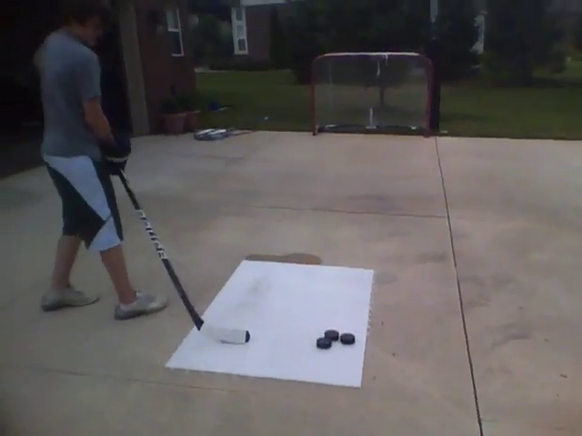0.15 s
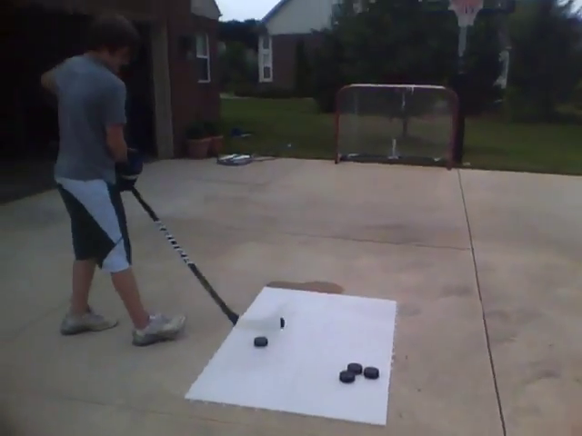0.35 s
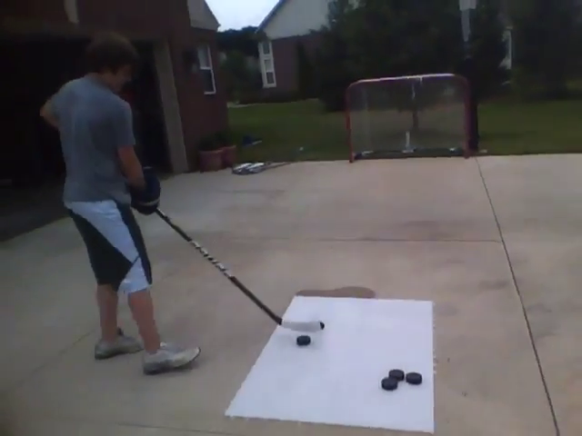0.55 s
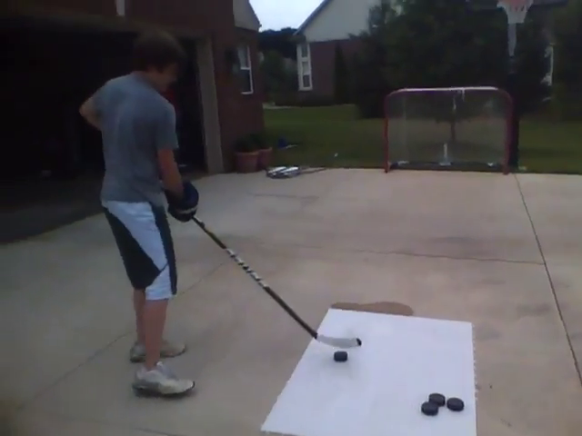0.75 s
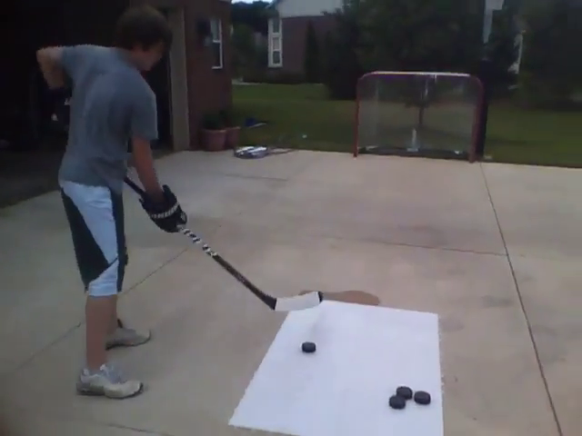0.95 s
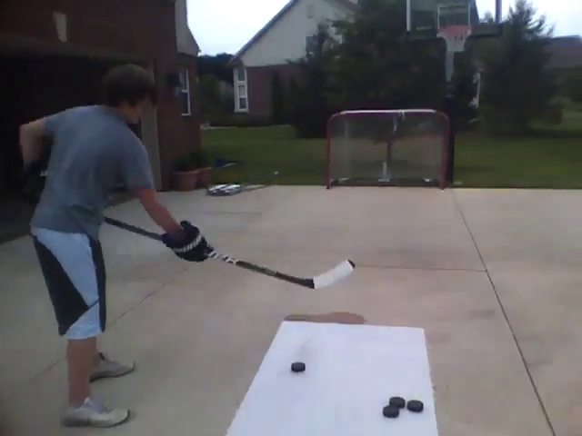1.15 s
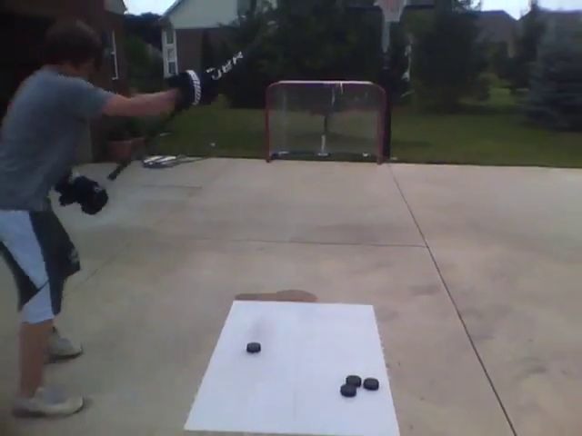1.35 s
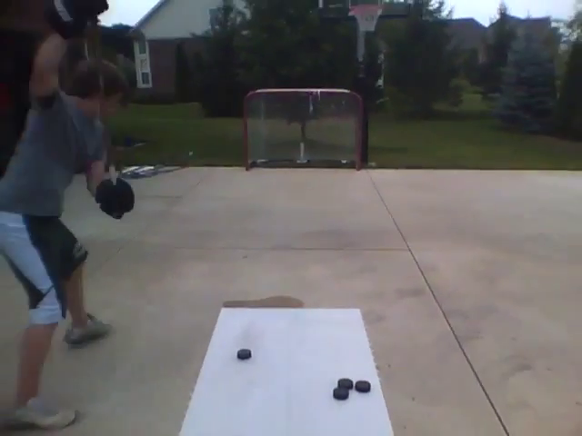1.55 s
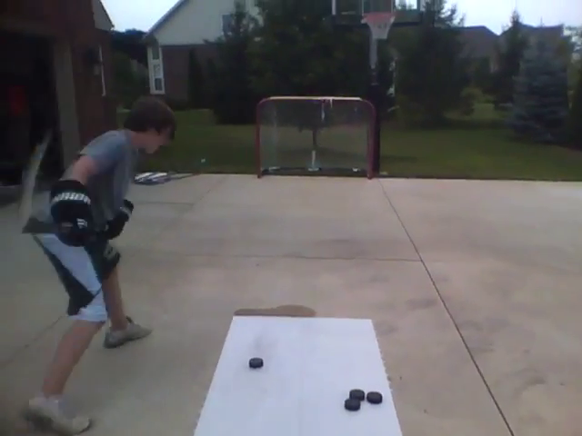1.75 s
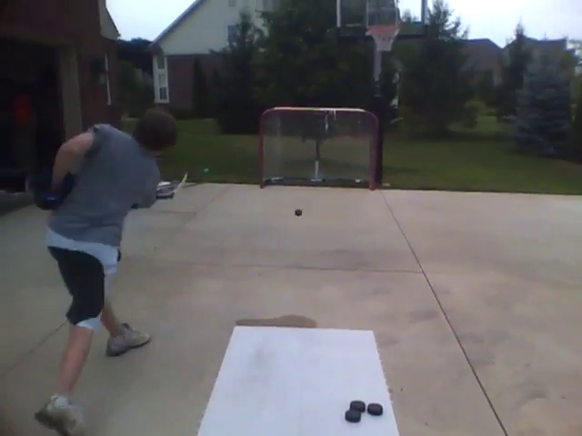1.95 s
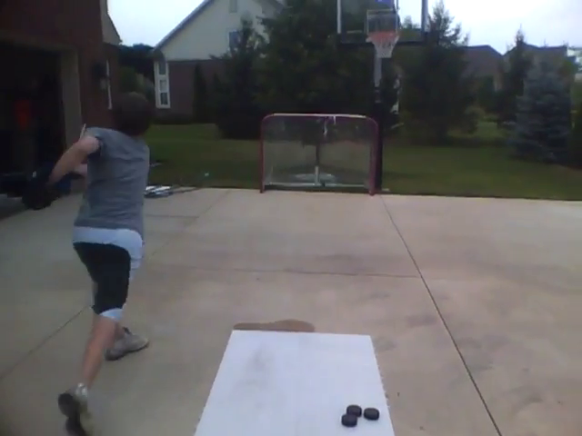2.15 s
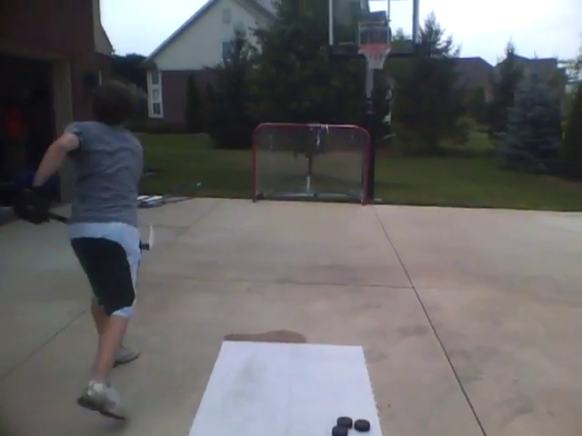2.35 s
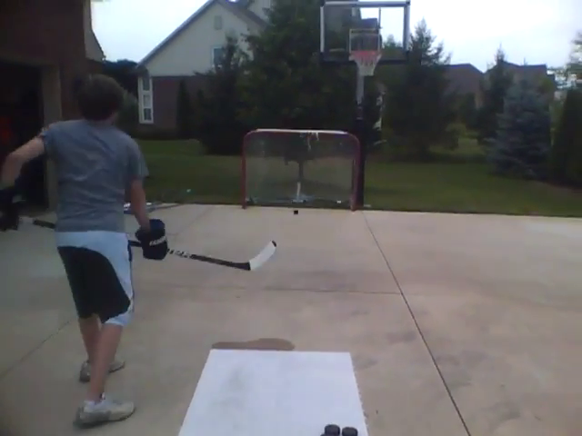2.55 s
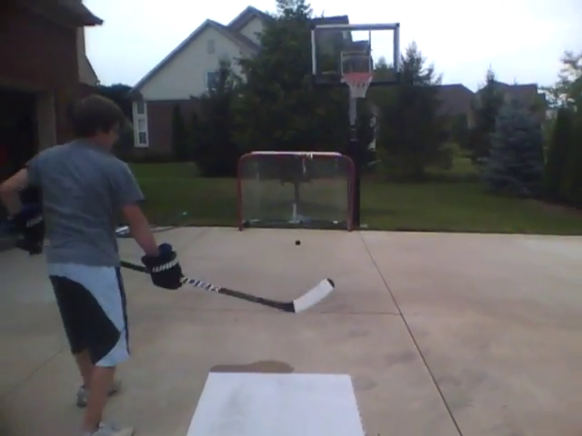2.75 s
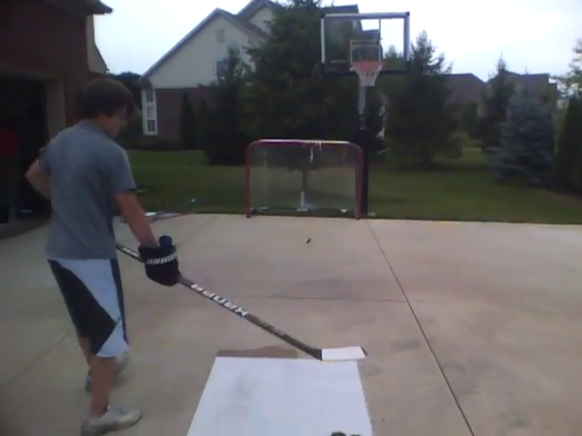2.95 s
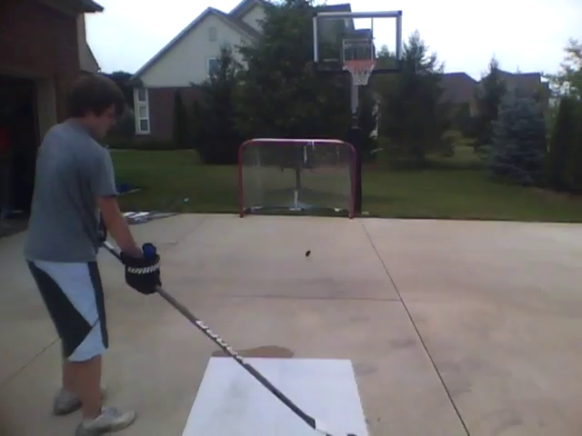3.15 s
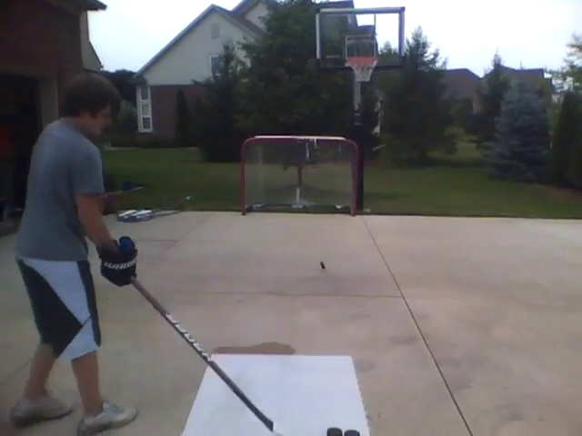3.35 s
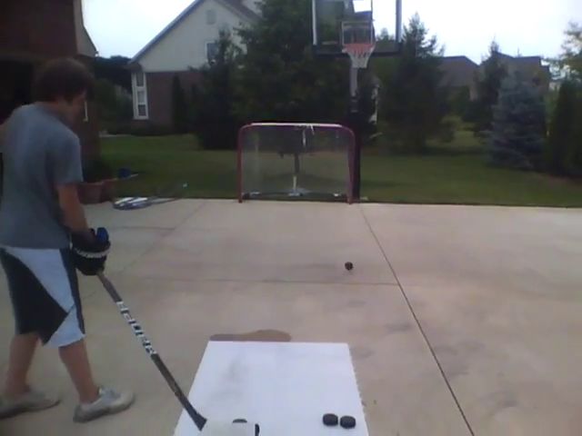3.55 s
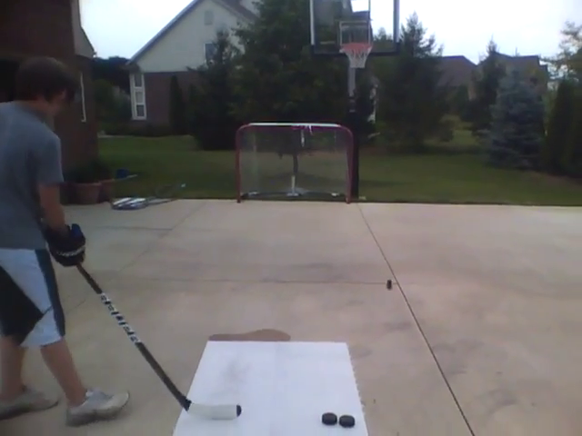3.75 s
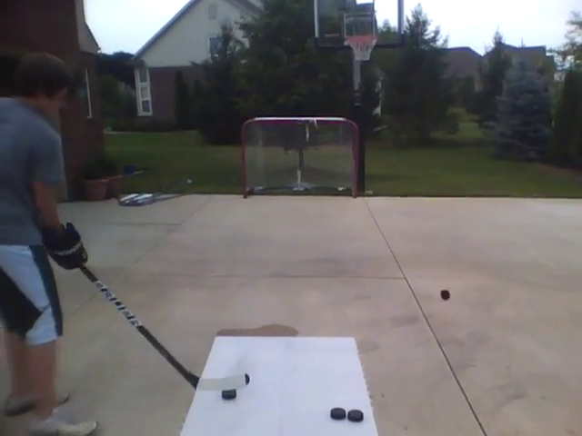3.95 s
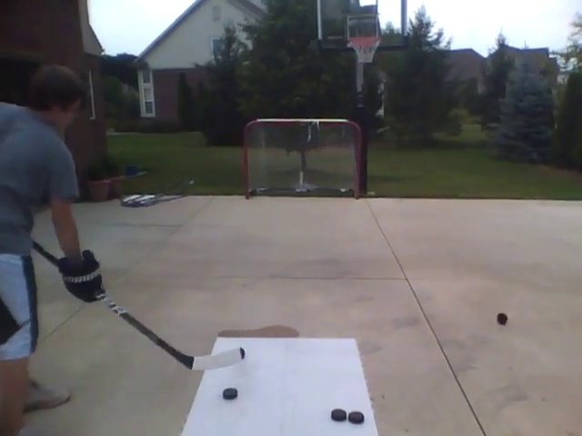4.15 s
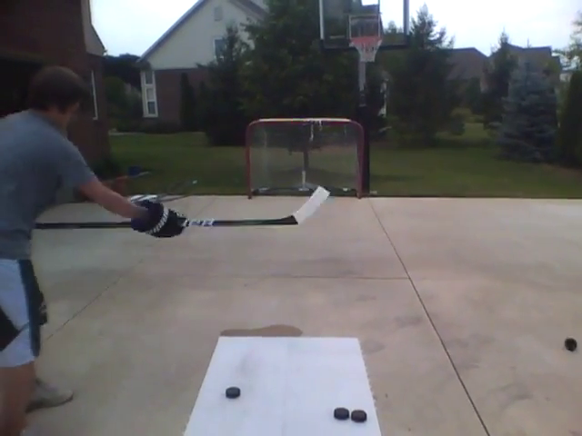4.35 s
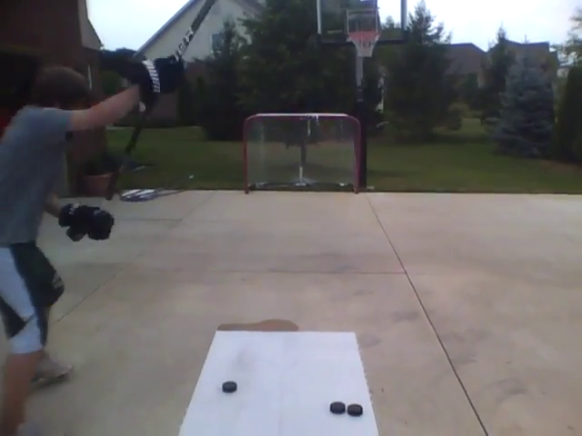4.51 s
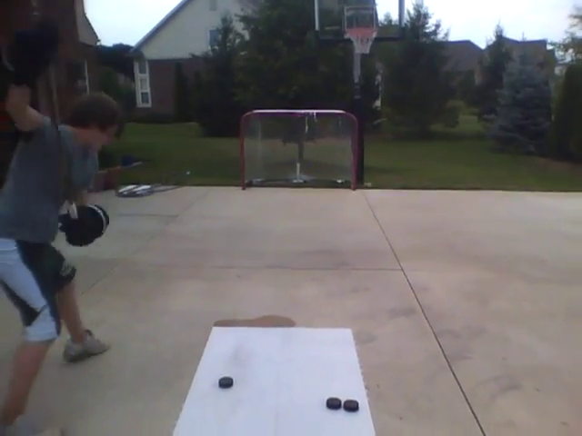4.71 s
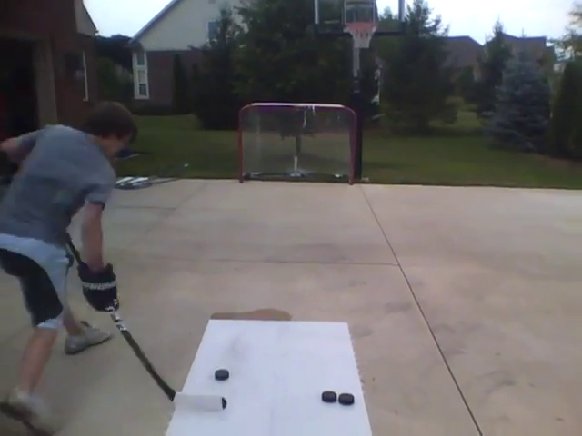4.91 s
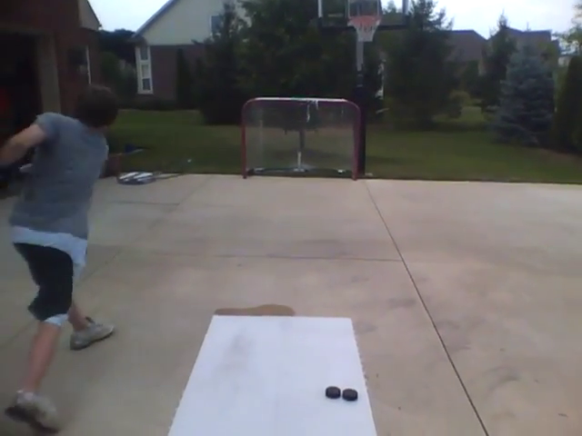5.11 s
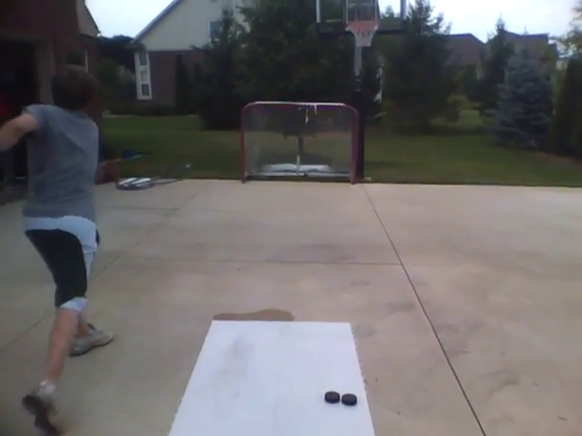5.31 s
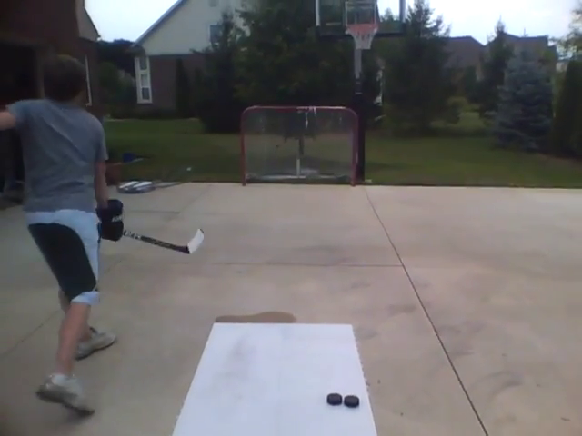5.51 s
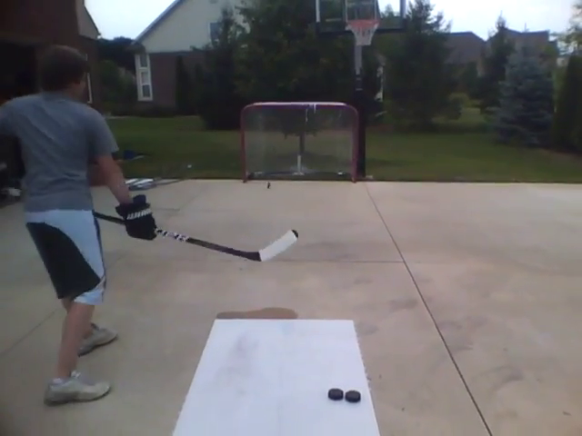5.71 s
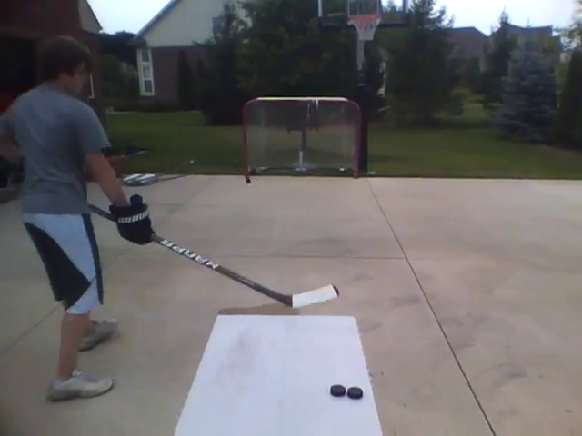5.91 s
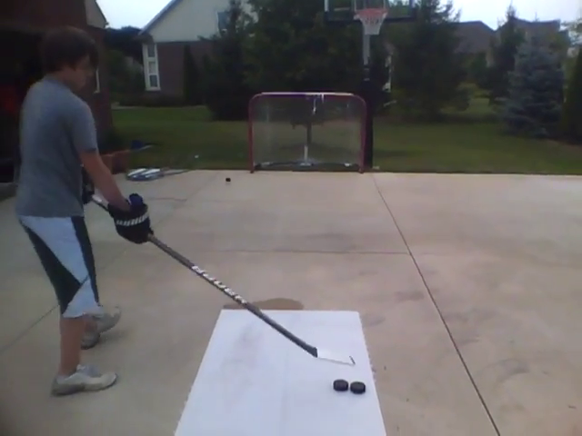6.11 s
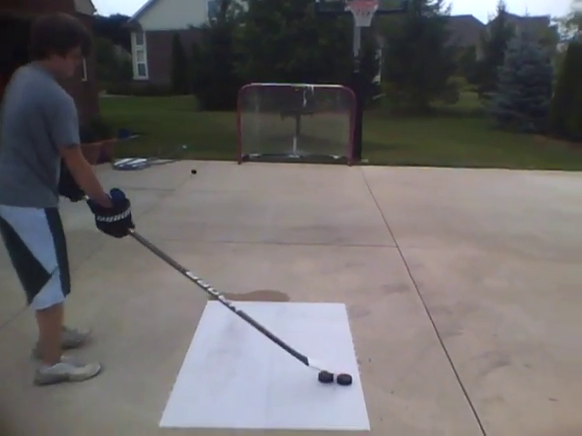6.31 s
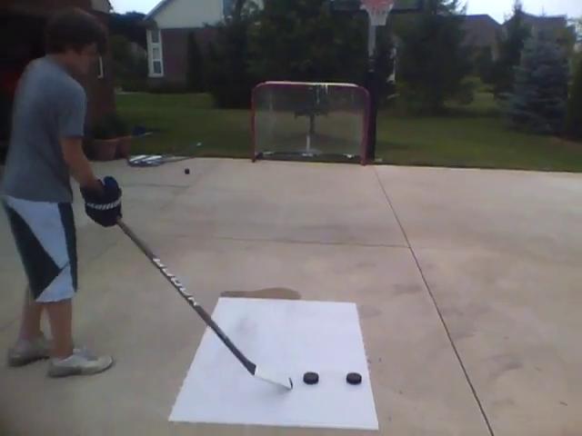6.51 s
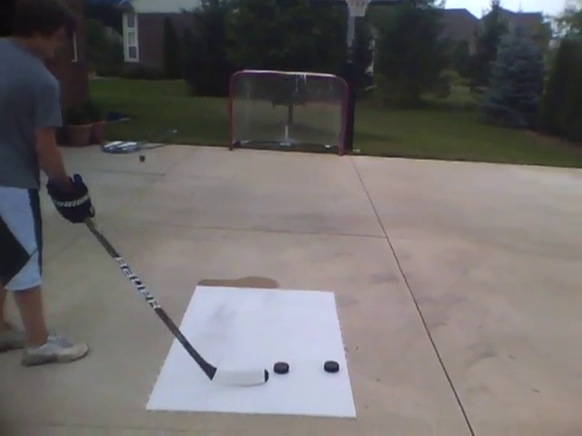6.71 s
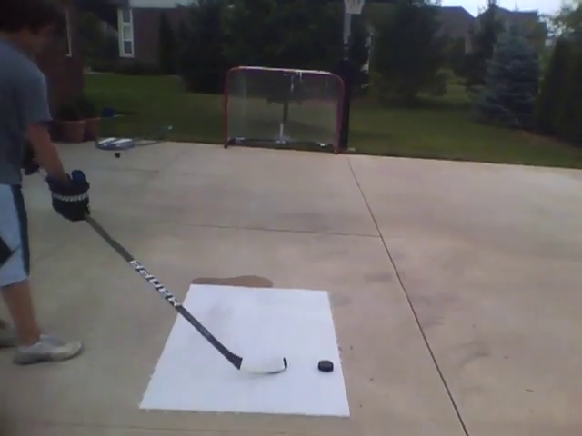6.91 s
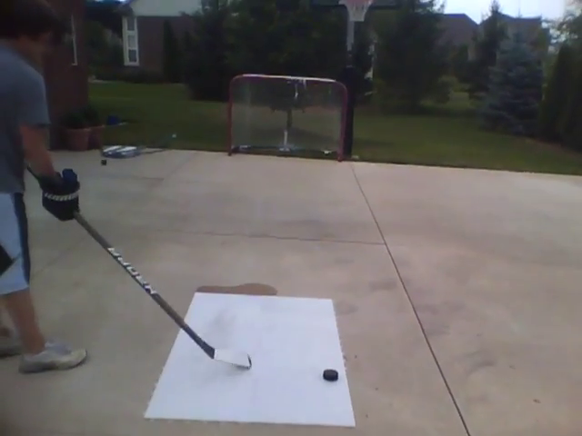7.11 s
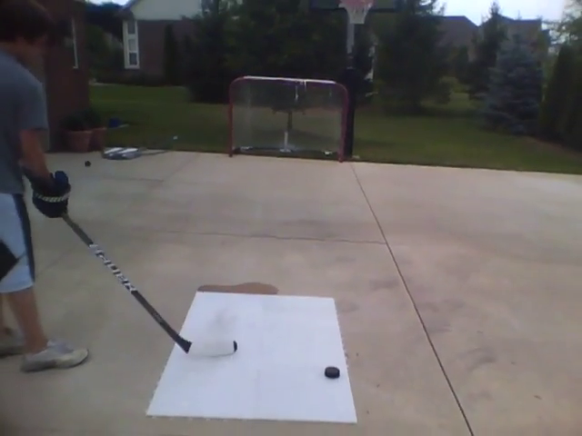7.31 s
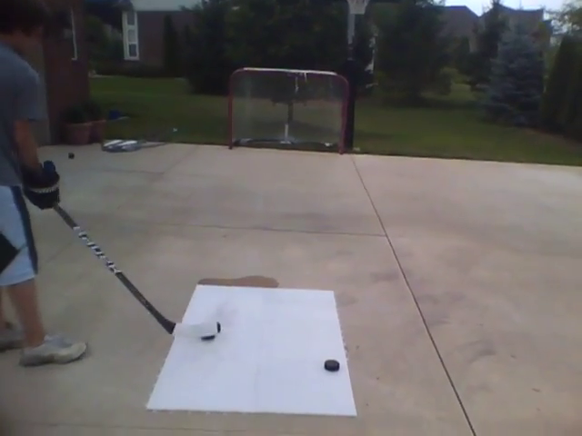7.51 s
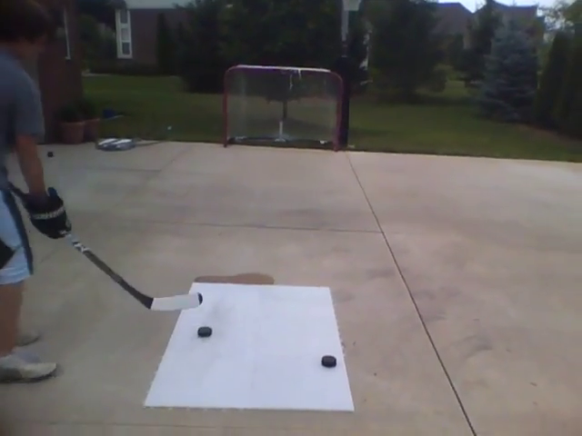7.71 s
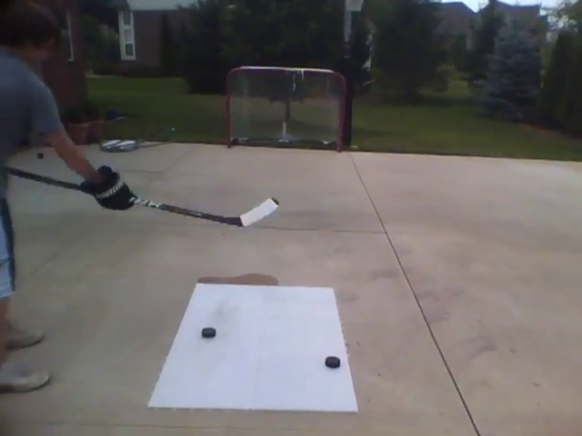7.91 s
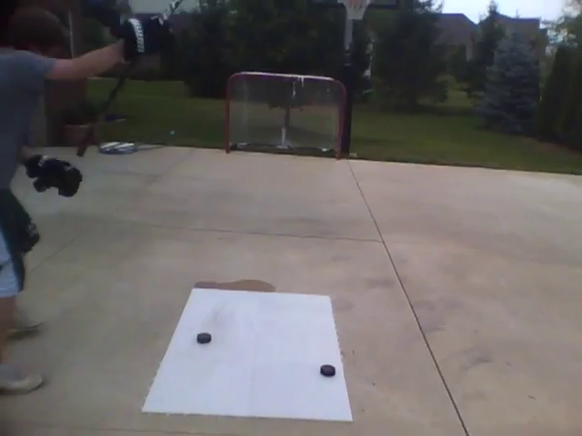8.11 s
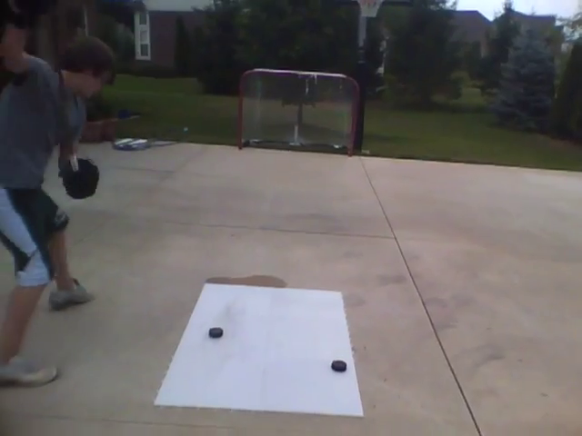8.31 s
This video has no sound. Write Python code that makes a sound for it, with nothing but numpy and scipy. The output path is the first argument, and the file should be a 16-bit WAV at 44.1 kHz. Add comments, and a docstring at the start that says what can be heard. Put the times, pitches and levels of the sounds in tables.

```python
"""Blade taps on a plastic pad and a puck clack lead, by way of a shoe skid, to a slap shot on a driveway.
The puck reaches the net; knocks, ticks and steps follow, then taps, a second skid and a second shot.
After it: net, scuffs, a sole squeak, more taps and drags, and a last skid. Contacts are filtered impulses
with dying noise, blade and pad ring as sines, rubs are grainy noise. Garage wall and houses echo it all
over an outdoor hush; a small camera clips the sum."""
import sys
import numpy as np
from scipy import signal
from scipy.fft import rfft, irfft
from scipy.io import wavfile
from scipy.ndimage import uniform_filter1d

SR = 44100
rng = np.random.default_rng(int(sys.argv[2]) if len(sys.argv) > 2 else 0)


def digitize_waveform(pressure):
    """Quantize a signal to 16-bit integers and store it at the path in sys.argv[1].

    Rows of a 2-D input are taken as channels; values are limited to [-1, 1].
    """
    field = np.atleast_2d(pressure).T
    bounded = np.clip(field, -1, 1)
    quanta = np.round(bounded * 32767).astype(np.int16)
    wavfile.write(sys.argv[1], SR, quanta)


N = 373086

# Slap shots: [t/s, slap on pad level/dB, hit on puck level/dB, puck in net level/dB]
SHOTS = [(1.8798, 19, 11, -26.5), (4.9801, 14, 17.5, -32)]
# Blade set down on pad: [t/s, level/dB, tilt/(dB/octave), chatter level/dB, ring pitch factor/1, first hop/s]
TAPS = [(0.031, -20, -2, 3.5, 0.83, 0.043), (0.6319, -13.5, -2.5, -5, .92, .077),
        (3.234, -5.5, 3, 0.5, 1.015, 0.07), (3.6781, -19.5, -1.5, -0.5, .73, 0.039),
        (3.819, -34.5, -3.5, 1, 1.12, 0.016), (6.2633, -12, -1.5, 4.5, 1.09, 0.032),
        (6.396, -19.5, 3, 3, 1.15, 0.07), (6.5300, -11.5, 0.5, 6, .97, 0.044),
        (6.941, -30, -5.5, 6, 1, 0.055), (7.4132, -24.5, -4.5, 2, .98, 0.047)]
# Blade edge against a puck: [t/s, level/dB]
CLACKS = [(0.8654, -5.5), (0.9953, -31), (6.609, -35.5), (7.180, -37), (7.889, -44)]
# Small dry knocks close by: [t/s, level/dB, tilt/(dB/octave)]
KNOCKS = [(.4212, -25.5, -2), (2.5822, -16.5, 2), (2.625, -28.5, -6), (2.872, -41, -5)]
# Sharp ticks of grit and loose pucks: [t/s, level/dB, tilt/(dB/octave)]
TICKS = [(0.351, -30, -7), (.381, -28, -6), (1.327, -42, -0.5), (1.8546, -35, 5), (2.227, -25.5, -3.5),
         (2.348, -33, -5.5), (4.11, -33, 1), (5.3319, -19, -3.5), (5.418, -24.5, -9.5), (6.2156, -37, 3),
         (6.225, -41.5, 4), (7.051, -37, -6), (7.1556, -33, -3), (7.808, -32.5, 3.5)]
# Soft footfalls: [t/s, level/dB, tilt/(dB/octave)]
STEPS = [(.262, -51, -4), (0.307, -36, -2), (.330, -46, 5), (2.318, -29.5, 0), (2.463, -33.5, -5),
         (3.801, -30.5, 2), (5.178, -34.5, -6), (5.269, -28.5, -12), (5.42, -28, 0.5), (5.613, -28.5, 2.5),
         (5.694, -26.5, -2.5), (6.067, -32.5, -4), (6.951, -36, -1.5)]
# Front shoe skidding: [t/s, level/dB]
STRIDES = [(1.648, -23.5), (4.753, -23), (8.371, -26.5)]
# Other sole scrapes: [t/s, length/s, level/dB, tilt/(dB/octave)]
SCUFFS = [(2.305, 0.056, -39.5, 5.5), (2.51, 0.036, -23.5, -.5), (4.083, 0.087, -34.5, -2.5),
          (5.406, 0.064, -35, 9), (5.622, 0.092, -30.5, -1), (7.817, 0.046, -37.5, -4.5)]
# Blade sliding over pad: [t/s, length/s, level/dB, tilt/(dB/octave)]
SLIDES = [(.09, 0.53, -47.5, -0.5), (3.36, 0.18, -35, 4), (3.53, .16, -40.5, 1.5), (6.42, 0.25, -42.5, 4),
          (6.95, 0.35, -41.5, 1.5), (7.22, 0.39, -48, -12.5)]
# Puck scraping along blade or over pad: [t/s, length/s, level/dB, tilt/(dB/octave)]
DRAGS = [(.44, .07, -46.5, -5.5), (.868, 0.028, -21.5, 3.5), (1.020, 0.066, -39.5, 2),
         (6.66, 0.29, -52.5, -6), (7.15, 0.27, -49, -2.5)]
# Hand shifting on the camera: [t/s, length/s, level/dB]
HANDLING = [(.2, 0.18, -44.5), (4.62, 0.66, -47), (5.077, 0.84, -45.5), (6.691, 0.7, -50.5)]

# Ring modes of blade and pad at pitch factor 1: [f/Hz, relative level/dB, t60/s]
BLADE_MODES = [(345, -45, 0.18), (462.3, 12, 0.098), (528, -19, 0.3), (775, 5, 0.13), (1074, 0, 0.18),
               (1279, 5.5, 0.05), (1645, 3.5, 0.064), (3190, -15, 0.059)]
# Relative spectrum of pad and puck under a shot: [f/Hz, level/dB]
SHOT_TONE = [(30, -18.5), (100, -14), (200, -7), (330, -8), (450, 2), (620, -7), (900, 2), (1400, -0.5),
             (1800, -2.5), (2300, -2.5), (3600, -2), (5000, -10), (10000, -23.5), (16000, -21)]
# Relative spectrum of air pushed from under the pad: [f/Hz, level/dB]
THUMP_TONE = [(15, -17.5), (40, 0.5), (100, 1.5), (170, -20), (400, -35), (2000, -60.5), (16000, -82)]
# Relative spectrum of blade on pad: [f/Hz, level/dB]
TAP_TONE = [(50, -37), (150, -24.5), (320, 2), (800, 3), (1300, 0.5), (1900, -8), (3000, -5), (4200, -13),
            (6000, -20.5), (10000, -31), (16000, -49)]
# Relative spectrum of puck on blade, struck or scraped: [f/Hz, level/dB]
CLACK_TONE = [(50, -24), (260, -14.5), (800, -13), (1500, -9), (2150, 1.5), (2600, -6.5), (3200, -6),
              (4000, -22.5), (4900, -10.5), (7000, -29), (10500, -29.5), (16000, -49)]
# Relative spectrum of a dry knock: [f/Hz, level/dB]
KNOCK_TONE = [(50, -23), (300, -1.5), (1400, 0), (1850, -12), (2250, 2.5), (3000, -7), (4000, -26),
              (5000, -57), (6000, -41), (16000, -120)]
# Relative spectrum of ticks and net: [f/Hz, level/dB]
TICK_TONE = [(100, -19.5), (900, -13.5), (2000, 2), (4300, 1.5), (6500, -5), (10000, -13), (16000, -24.5)]
# Relative spectrum of a footfall: [f/Hz, level/dB]
STEP_TONE = [(30, -28), (80, -6.5), (160, 3), (300, 2), (600, -17), (1500, -31), (5000, -46), (16000, -48)]
# Relative spectrum of sole on concrete: [f/Hz, level/dB]
SCUFF_TONE = [(60, -23.5), (450, -11), (720, -16), (1200, -2), (1900, -9.5), (2450, -1.5), (2800, -6),
              (3400, 1.5), (4300, -3.5), (6200, -15.5), (10000, -19.5), (16000, -31)]
# Relative spectrum of blade sliding on pad: [f/Hz, level/dB]
SLIDE_TONE = [(60, -2), (250, 3.5), (450, 14), (700, 4), (1100, 5), (2100, -4.5), (3500, -4), (5500, -15),
              (10000, -27.5), (16000, -36)]
# Relative spectrum of handling through the camera body: [f/Hz, level/dB]
HANDLING_TONE = [(20, -7.5), (50, 3.5), (110, 5.5), (190, -9), (320, -11), (1000, -33), (16000, -69.5)]
# Relative spectrum of outdoor hush and microphone hiss: [f/Hz, level/dB]
AIR_TONE = [(15, -45), (25, -13.5), (43, -4.5), (82, -5), (113, -4), (233, -8.5), (252, -6.5), (358, -12),
            (893, -14.5), (1050, -15.5), (1610, -16), (2170, -17), (3430, -14.5), (4140, -19.5),
            (15400, -30.5)]

# Walls: [delay/s, level/dB, t60/s of scatter from brick and siding]
WALLS = [(0.016, -12.5, 0.015), (0.0503, -25.5, .04), (0.097, -30.5, .02)]
# Near wash between the houses, relative spectrum: [f/Hz, level/dB]
NEAR_TONE = [(50, -21.5), (200, -4), (500, 3.5), (4000, 0.5), (9000, 7), (16000, -7)]
# Near wash decay: [f/Hz, t60/s]
NEAR_T60 = [(100, 0.14), (1000, 0.1), (4000, 0.33), (14000, .28)]
# Far wash between the houses, relative spectrum: [f/Hz, level/dB]
FAR_TONE = [(50, -10), (300, -4), (1000, -0.5), (4000, -1), (9000, -4.5), (16000, -16)]
# Far wash decay: [f/Hz, t60/s]
FAR_T60 = [(100, 1.5), (600, 1.6), (2000, 1.53), (4000, 1.1), (8000, 1.1), (14000, .5)]

# Shot: blade lands behind the puck, meets it, whips on through; lags from the slap, whip and thump re slap
PUCK_LAG_S, WHIP_LAG_S, NET_LAG_S = .0111, .024, .297
WHIP_DB, THUMP_DB = -14.5, -15.5
SHOT_CHATTER_DB, SHOT_T60_S = 7.5, .045  # chatter is always re first contact
# Tap, then its slap back from the garage wall (re tap), then two hops
TAP_T60_S, WALL_SLAP_LAG_S, WALL_SLAP_DB = 0.066, .017, -11
HOP_DB, HOP_SHARE, HOP_TILT_DB, HOP_CHATTER_DB = -23, 0.5, -8, 4  # share: dB per dB of the tap
NEXT_HOP_FACTOR, NEXT_HOP_DB = .68, -4  # second hop, re first
CLACK_CHATTER_DB, CLACK_CHATTER_SHARE = -6.5, 0.26  # chatter of a 0 dB clack; dB gained per dB softer
TICK_T60_S, TICK_REF_DB, TICK_T60_SHARE = .06, -26, 0.46  # t60 at reference level; how far it follows level
# Stride: front skid, then the back shoe dragged after it (re skid)
SKID_S, TRAIL_LAG_S, TRAIL_S, TRAIL_DB = 0.078, 0.15, 0.093, -9
SQUEAK_AT_S, SQUEAK_S, SQUEAK_DB, SQUEAK_HZ = 5.638, .0156, -22.5, (4930, 3370)
AIR_DB = -50
EDGE_HZ = 15650


def amp(db):
    """Decibels to gain."""
    return 10 ** (np.asarray(db) / 20)


def read(points, hz):
    """Joins points by straight lines on a log-frequency axis."""
    f, value = np.transpose(points)
    return np.interp(np.log(hz + 1), np.log(f + 1), value)


def unit(x):
    """Scales to energy 1."""
    return x / np.sqrt(np.sum(x ** 2) + 1e-20)


def add(mix, at_s, sound):
    """Lays a sound into the mix at a time, cut at the end."""
    part = mix[max(round(at_s * SR), 0):][:len(sound)]
    part += sound[:len(part)]


def laid(sounds):
    """A track made of (t/s, sound) pairs."""
    out = np.zeros(N)
    for at_s, sound in sounds:
        add(out, at_s, sound)
    return out


def colour(x, tone, tilt_db=0, lag_s=0, size=4096):
    """Causal spectrum filter, tilted about 1 kHz; bending waves bring treble first (lag_s: delay at 1 kHz)."""
    khz = np.fft.fftfreq(size, 1000 / SR)
    octaves = np.log2(np.maximum(abs(khz), .2))  # tilt stops below 200 Hz
    log_gain = np.log(amp(read(tone, 1000 * abs(khz)) + tilt_db * octaves))
    minimum_phase = np.conj(signal.hilbert(log_gain))
    bending = 4000 * np.pi * abs(lag_s) * np.sign(khz) * np.sqrt(abs(khz))
    taps = np.fft.ifft(np.exp(minimum_phase - 1j * bending)).real[:size // 2]
    return signal.fftconvolve(x, unit(taps))[:len(x)]


def dying_noise(t60_s, size=16384):
    """Dense tiny contacts that die away, energy 1."""
    t = np.arange(size) / SR
    return unit(rng.standard_normal(size) * amp(-60 * t / max(t60_s, .002)))


def blow(tone, db, tilt_db, chatter_db, t60_s, lag_s=0):
    """A hard contact, then chatter of the two surfaces; db sets their whole energy as a level over 5 ms."""
    force = amp(chatter_db) * dying_noise(t60_s)
    force[0] += 1
    return amp(db) * np.sqrt(SR / 200) * colour(unit(force), tone, tilt_db, lag_s)


def rubs(table, tone, grain_db, rise, fall, count=800):
    """Friction: uneven grains (count per s) in a stroke that bites and lets go (rise, fall: shares of it)."""
    out, t = np.zeros(N), np.arange(SR) / SR
    for at_s, length_s, db, tilt_db in table:
        grains = np.interp(t, np.linspace(0, 1, count), rng.uniform(-1, 1, count))
        hiss = colour(rng.standard_normal(len(t)) * amp(grain_db * grains), tone, tilt_db)
        bite = np.clip(t / length_s / rise, 0, 1) ** .5
        release = np.clip((1 - t / length_s) / fall, 0, 1)
        add(out, at_s, amp(db) * bite * release * hiss / hiss.std())
    return out


def slap_shots(slap_tilt_db=1, puck_tilt_db=.2, whip_tilt_db=-1.0):
    """Three contacts run together into one crack: pad, puck, follow-through."""
    out = np.zeros(N)
    for at_s, slap_db, puck_db, _ in SHOTS:
        contacts = [(0, slap_db, slap_tilt_db),
                    (PUCK_LAG_S, puck_db, puck_tilt_db),
                    (WHIP_LAG_S, slap_db + WHIP_DB, whip_tilt_db)]
        for lag_s, db, tilt_db in contacts:
            add(out, at_s + lag_s, blow(SHOT_TONE, db, tilt_db, SHOT_CHATTER_DB, SHOT_T60_S))
    return out


def pad_thumps():
    """Each slap pushes a puff of air from under the pad."""
    return laid((at_s, blow(THUMP_TONE, slap_db + THUMP_DB, 0, chatter_db=-8.5, t60_s=0.041))
                for at_s, slap_db, _, _ in SHOTS)


def net(tilt_db=7):
    """The puck ends its flight with a flick and a bright rustle of netting."""
    return laid((at_s + NET_LAG_S, blow(TICK_TONE, db, tilt_db, chatter_db=13, t60_s=0.39))
                for at_s, _, _, db in SHOTS)


def blade_contact(db, tilt_db, chatter_db, pitch, ring_db=-5, tilt_share=0.55, size=12000):
    """A blow that also sets blade and pad ringing."""
    t = np.arange(size) / SR
    ring = np.zeros(size)
    for hz, mode_db, t60_s in BLADE_MODES:
        tilted_db = mode_db + tilt_share * tilt_db * np.log2(hz / BLADE_MODES[0][0])
        ring += amp(tilted_db - 60 * t / t60_s) * np.sin(2 * np.pi * hz * pitch * t)
    ring = amp(db + ring_db) * np.sqrt(SR / 200) * unit(ring)
    return ring + blow(TAP_TONE, db, tilt_db, chatter_db, TAP_T60_S, lag_s=0.000901)[:size]


def stick_taps():
    """Tap, then its slap back from the garage wall, then two small dull hops as the blade settles."""
    out = np.zeros(N)
    for at_s, db, tilt_db, chatter_db, pitch, hop_s in TAPS:
        hop_db = HOP_DB + HOP_SHARE * db
        next_s = hop_s * (1 + NEXT_HOP_FACTOR)
        add(out, at_s, blade_contact(db, tilt_db, chatter_db, pitch))
        wall_slap = blade_contact(db + WALL_SLAP_DB, tilt_db, chatter_db, pitch)
        add(out, at_s + WALL_SLAP_LAG_S, wall_slap)
        for lag_s, level_db in [(hop_s, hop_db), (next_s, hop_db + NEXT_HOP_DB)]:
            add(out, at_s + lag_s, blade_contact(level_db, HOP_TILT_DB, HOP_CHATTER_DB, pitch))
    return out


def blade_slides():
    """Friction of the blade over the pad."""
    return rubs(SLIDES, SLIDE_TONE, grain_db=7, rise=.45, fall=.45)


def pucks():
    """Pucks clack on the blade and scrape along it; a light touch chatters more than a firm one."""
    out = np.zeros(N)
    for at_s, db in CLACKS:
        chatter_db = CLACK_CHATTER_DB - CLACK_CHATTER_SHARE * db
        add(out, at_s, blow(CLACK_TONE, db, 0.4, chatter_db, t60_s=0.058, lag_s=0.00097))
    return out + rubs(DRAGS, CLACK_TONE, grain_db=-4.5, rise=.12, fall=0.16)


def shoes():
    """Footfalls, the skid and drag of each stride, stray scuffs and a squeak."""
    steps = laid((at_s, blow(STEP_TONE, db, tilt_db, chatter_db=6.5, t60_s=0.11, lag_s=0.00077))
                 for at_s, db, tilt_db in STEPS)
    skids = [(at_s, SKID_S, db, 0) for at_s, db in STRIDES]
    trails = [(at_s + TRAIL_LAG_S, TRAIL_S, db + TRAIL_DB, 0) for at_s, db in STRIDES]
    scrapes = rubs(skids + trails + SCUFFS, SCUFF_TONE, grain_db=6, rise=0.63, fall=0.63)
    return steps + scrapes + squeak()


def squeak(waver=0.19):
    """Rubber sticks and slips quickly on concrete; the pitch falls as the foot slows."""
    hz = np.linspace(*SQUEAK_HZ, round(SQUEAK_S * SR))
    turns = np.cumsum(hz * (1 + waver * rng.standard_normal(len(hz)))) / SR
    tone = np.sqrt(2) * np.sin(2 * np.pi * turns) * np.hanning(len(hz))
    return laid([(SQUEAK_AT_S, amp(SQUEAK_DB) * tone)])


def knocks():
    """Single dry contacts with hardly any chatter."""
    return laid((at_s, blow(KNOCK_TONE, db, tilt_db, chatter_db=-10, t60_s=0.048, lag_s=0.00067))
                for at_s, db, tilt_db in KNOCKS)


def ticks():
    """Small sharp contacts; the harder ones crunch longer."""
    out = np.zeros(N)
    for at_s, db, tilt_db in TICKS:
        t60_s = TICK_T60_S * amp(TICK_T60_SHARE * (db - TICK_REF_DB))
        add(out, at_s, blow(TICK_TONE, db, tilt_db, 0, t60_s, lag_s=0.0014))
    return out


def handling(tilt_db=4):
    """Lumpy rumble through the camera's body."""
    table = [(at_s, length_s, db, tilt_db) for at_s, length_s, db in HANDLING]
    return rubs(table, HANDLING_TONE, grain_db=7, rise=0.097, fall=0.21, count=48)


def yard(x, near_db=-19, far_db=-27.5, wall_hz=7000):
    """What comes back: dull slaps from the walls, a near wash and a long far one."""
    slaps, dull = np.zeros(SR // 2), signal.butter(1, wall_hz, fs=SR)
    for delay_s, db, t60_s in WALLS:
        add(slaps, delay_s, amp(db) * signal.lfilter(*dull, dying_noise(t60_s)))
    near = amp(near_db) * wash(x, NEAR_TONE, NEAR_T60, onset_s=0.037, patchy_db=-2.5)
    far = amp(far_db) * wash(x, FAR_TONE, FAR_T60, onset_s=0.054, patchy_db=1.8)
    return signal.fftconvolve(x, slaps)[:N] + near + far


def wash(x, tone, t60s, onset_s, patchy_db, size=256):
    """Countless paths scramble the waveform: only band power lingers, building up and dying in clumps."""
    hz, t, z = signal.stft(x, SR, nperseg=size)
    age_s = t[t < 2]
    decay = amp(-120 * age_s / read(t60s, hz)[:, None])  # power, hence -120
    lingering = decay * (1 - np.exp(-(age_s / onset_s) ** 2)) ** 2
    lingering /= lingering.sum(1, keepdims=True)
    band_power = uniform_filter1d(abs(z) ** 2, size=3, axis=0)
    power = abs(signal.fftconvolve(band_power, lingering, axes=1)[:, :len(t)])
    grain = signal.stft(rng.standard_normal(N), SR, nperseg=size)[2]
    clumps = uniform_filter1d(rng.standard_normal(z.shape), size=8, axis=1)
    clumps = uniform_filter1d(clumps, size=4, axis=0)
    gain = amp(read(tone, hz)[:, None] + patchy_db * clumps / clumps.std())
    return signal.istft(np.sqrt(power) * gain * grain / grain.std(), SR, nperseg=size)[1][:N]


def air(swell_db=-1.08, count=40):
    """Distant outdoor hush and microphone hiss: shaped noise, swelling slightly."""
    spectrum = rfft(rng.standard_normal(N)) * amp(read(AIR_TONE, np.fft.rfftfreq(N, 1 / SR)))
    hush = irfft(spectrum, N)
    swell = np.interp(np.arange(N), np.linspace(0, N, count), rng.standard_normal(count))
    return amp(AIR_DB + swell_db * swell) * hush / hush.std()


def scene(small_echo_db=-2, puck_echo_db=-12, knock_echo_db=-18):
    """Stick, pucks and shoes on the driveway; near sounds stir the yard less."""
    shots, puck, knock = slap_shots(), pucks(), knocks()
    small = stick_taps() + blade_slides() + shoes() + ticks() + net()
    sent = shots + amp(small_echo_db) * small + amp(puck_echo_db) * puck + amp(knock_echo_db) * knock
    direct = shots + small + puck + knock + pad_thumps() + handling()
    return (direct + yard(sent) + air())[None]


def record(dry):
    """The camera clips hard at full scale; then its band limit."""
    clipped = np.clip(dry, -1, 1)
    low_pass = signal.firwin(511, EDGE_HZ, window=("kaiser", 8), fs=SR)
    return signal.oaconvolve(clipped, low_pass[None], "same")


dry = scene()
out = record(dry)
digitize_waveform(out)
```